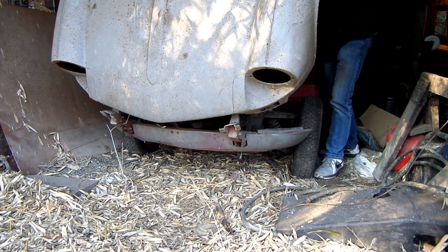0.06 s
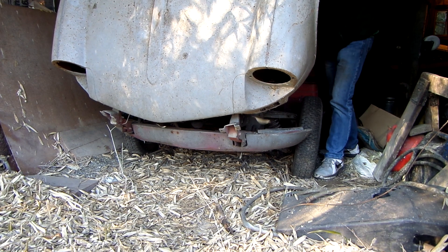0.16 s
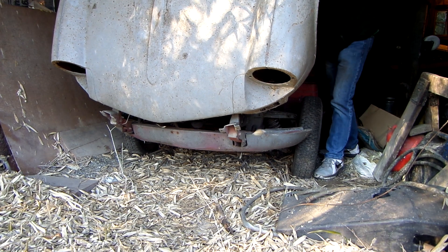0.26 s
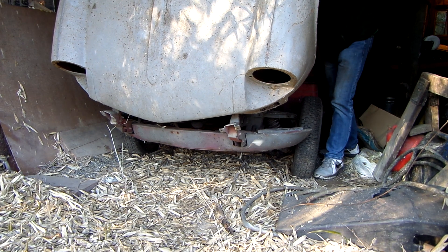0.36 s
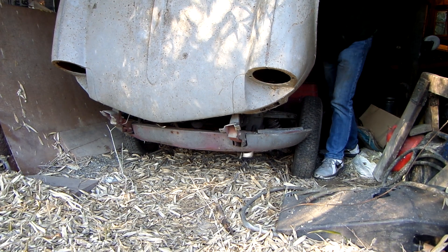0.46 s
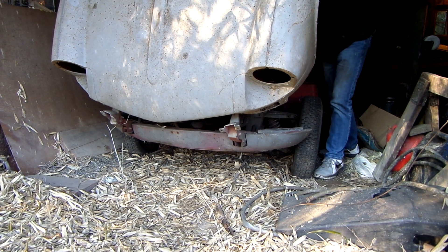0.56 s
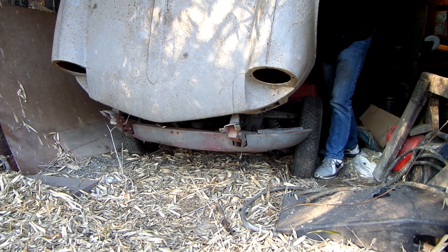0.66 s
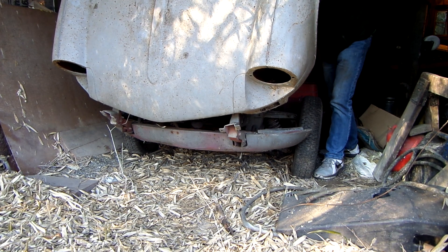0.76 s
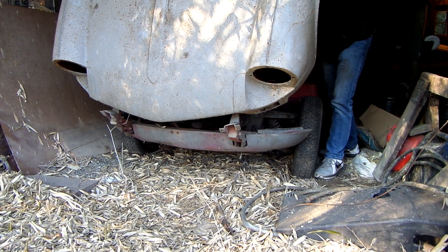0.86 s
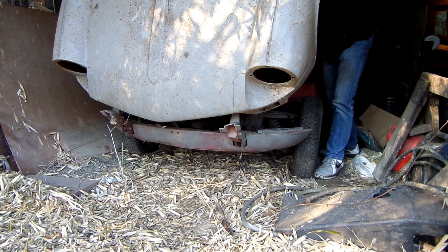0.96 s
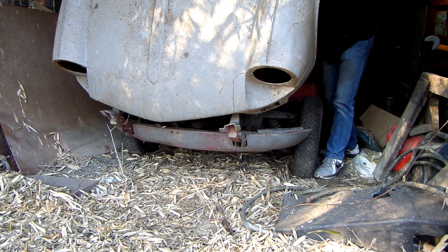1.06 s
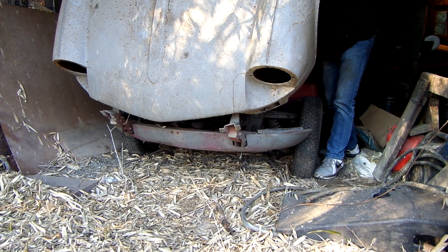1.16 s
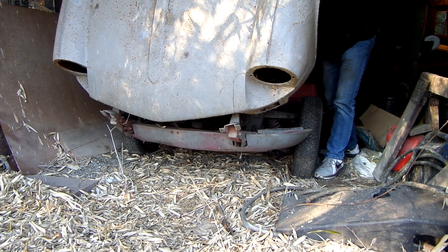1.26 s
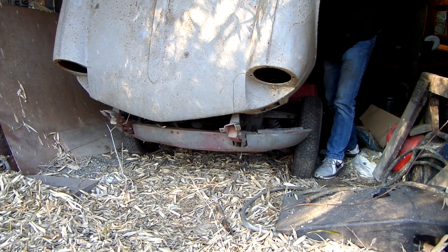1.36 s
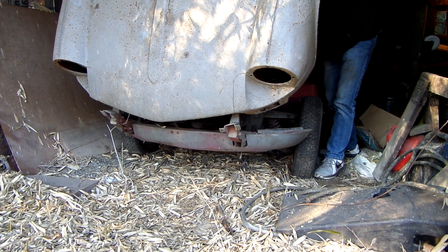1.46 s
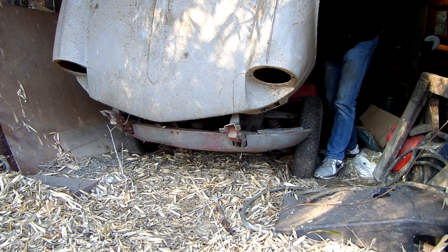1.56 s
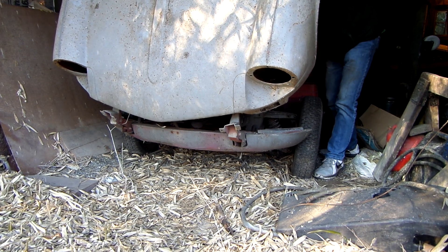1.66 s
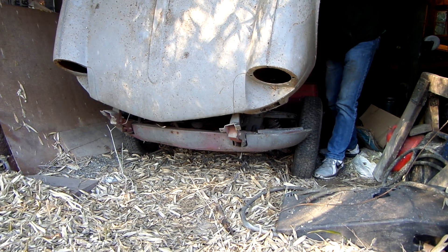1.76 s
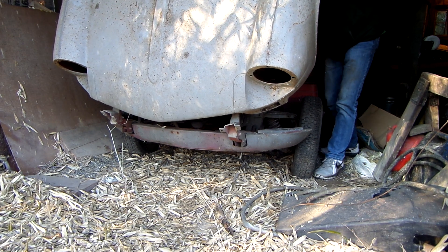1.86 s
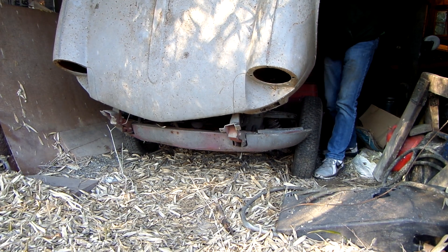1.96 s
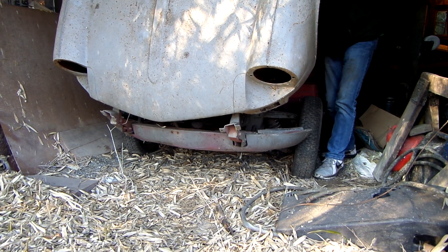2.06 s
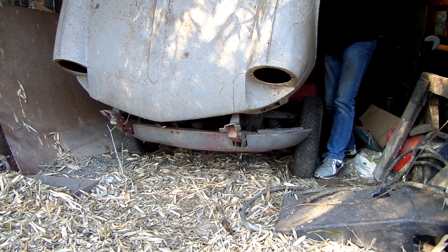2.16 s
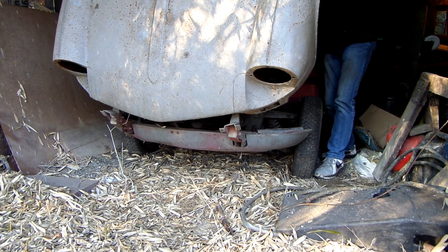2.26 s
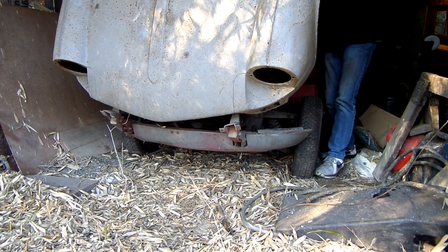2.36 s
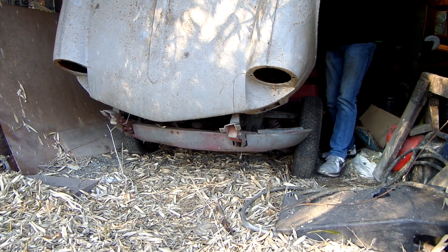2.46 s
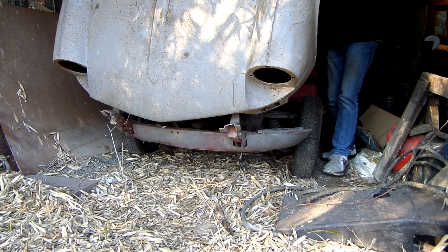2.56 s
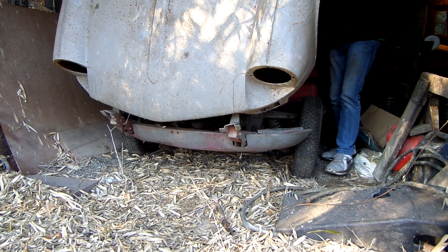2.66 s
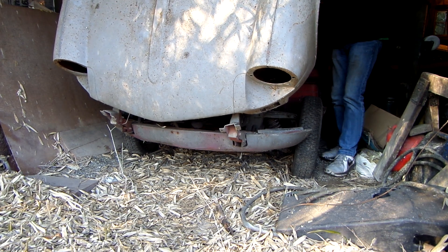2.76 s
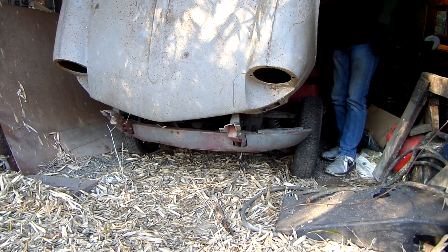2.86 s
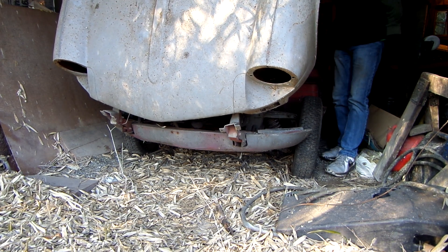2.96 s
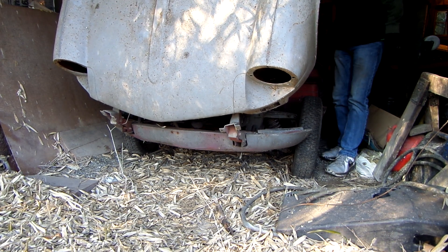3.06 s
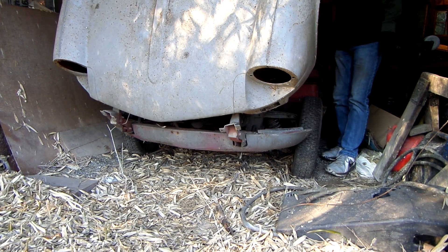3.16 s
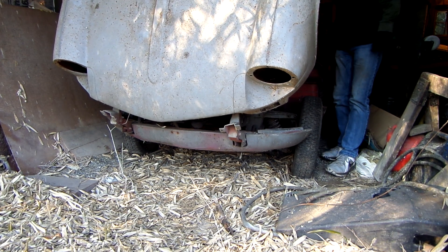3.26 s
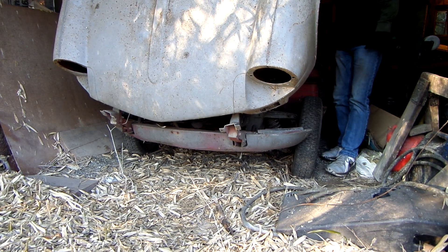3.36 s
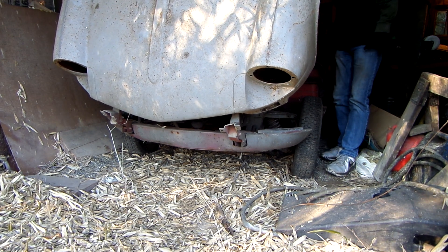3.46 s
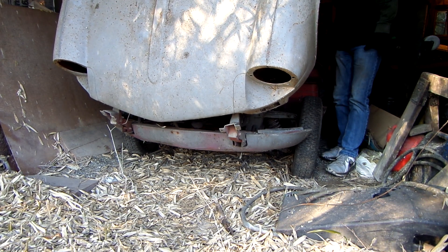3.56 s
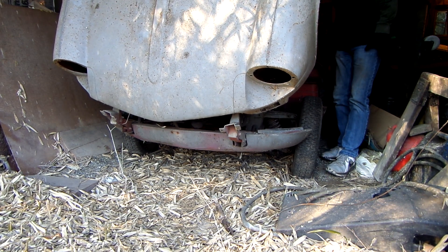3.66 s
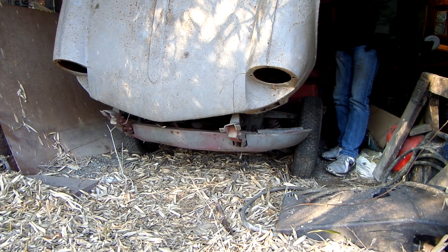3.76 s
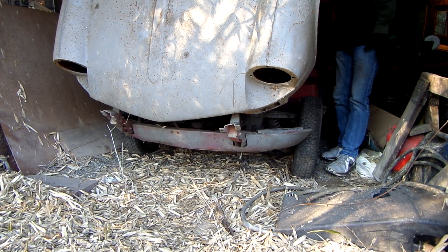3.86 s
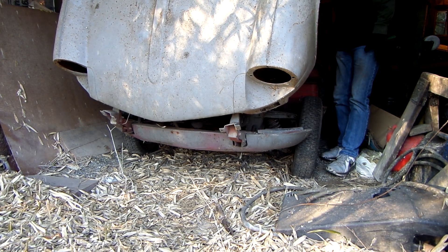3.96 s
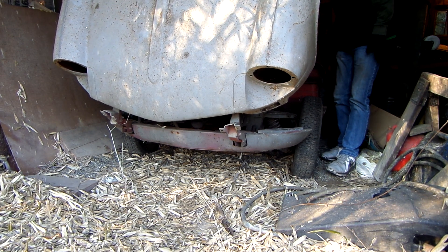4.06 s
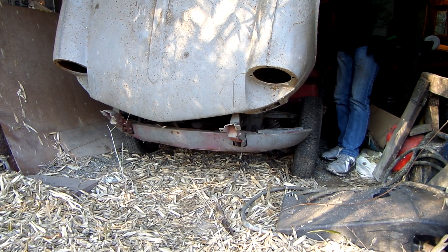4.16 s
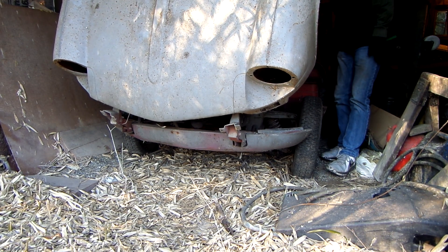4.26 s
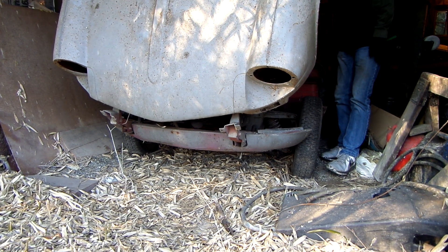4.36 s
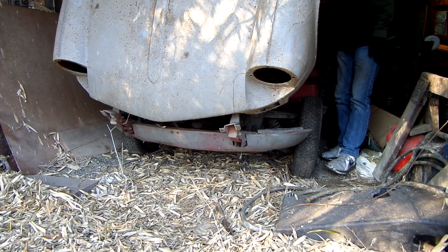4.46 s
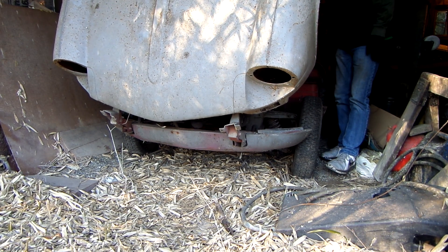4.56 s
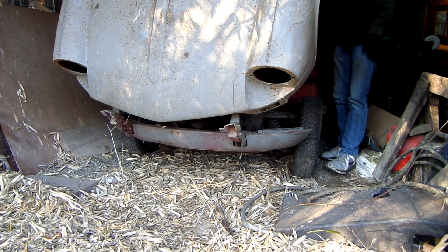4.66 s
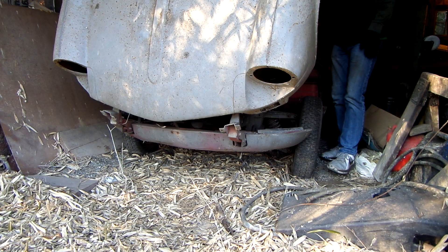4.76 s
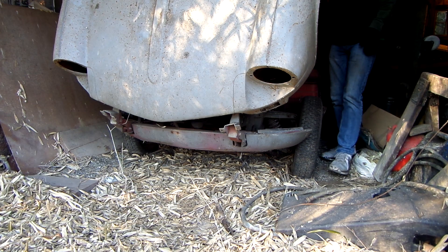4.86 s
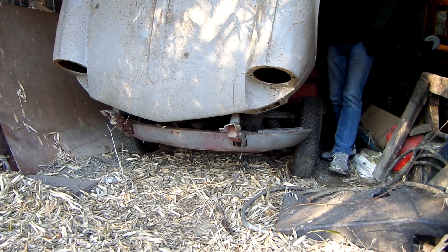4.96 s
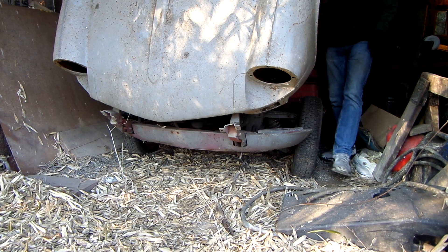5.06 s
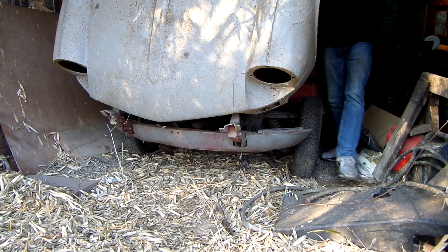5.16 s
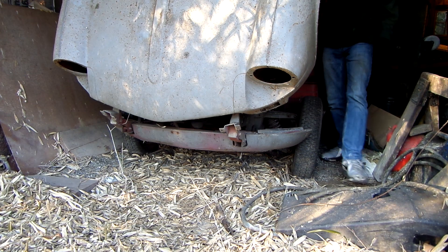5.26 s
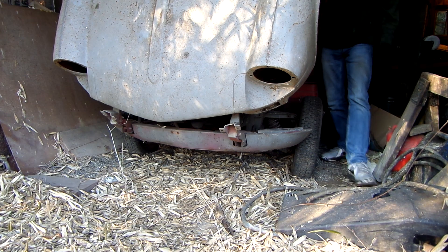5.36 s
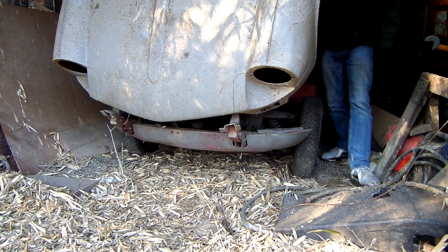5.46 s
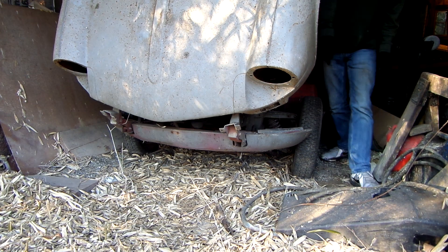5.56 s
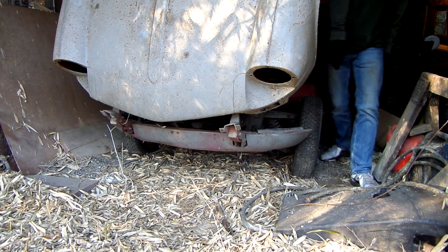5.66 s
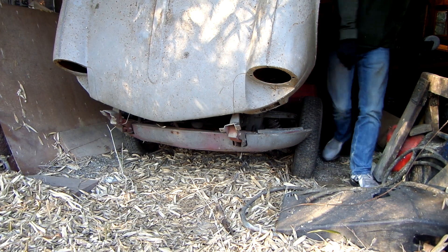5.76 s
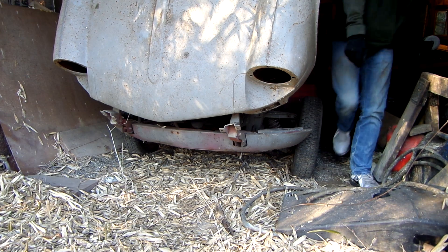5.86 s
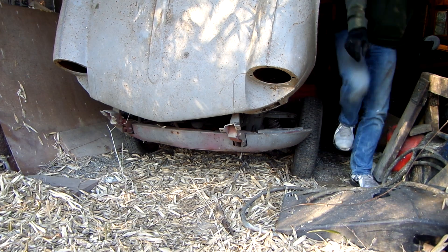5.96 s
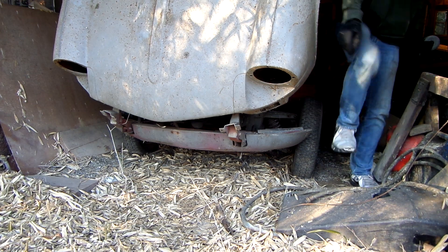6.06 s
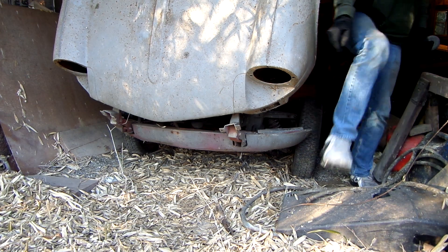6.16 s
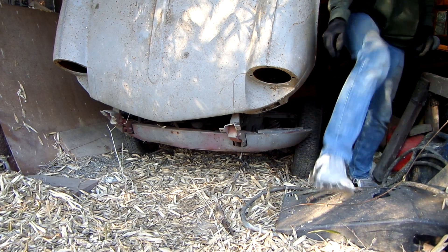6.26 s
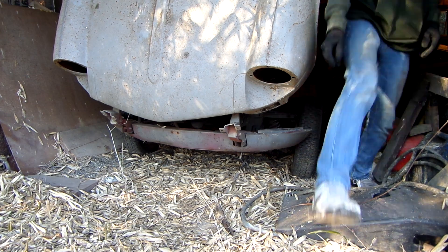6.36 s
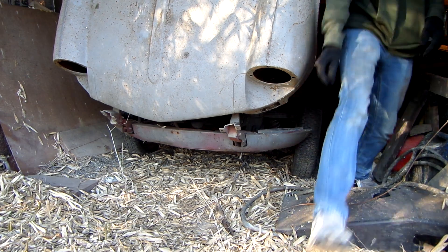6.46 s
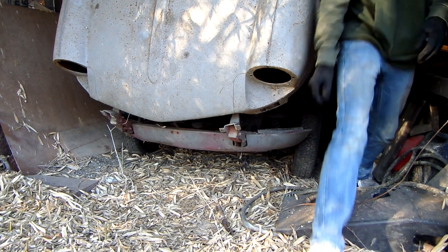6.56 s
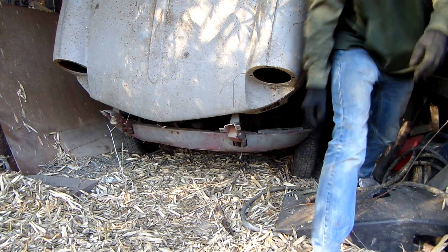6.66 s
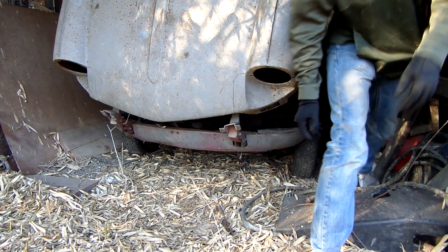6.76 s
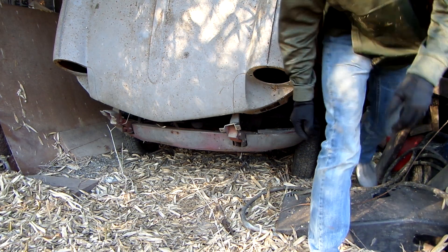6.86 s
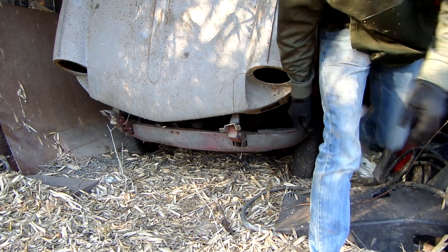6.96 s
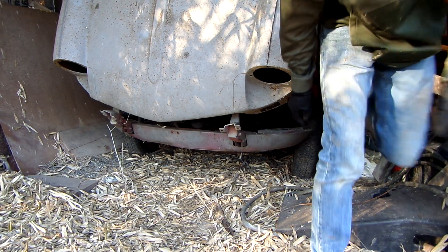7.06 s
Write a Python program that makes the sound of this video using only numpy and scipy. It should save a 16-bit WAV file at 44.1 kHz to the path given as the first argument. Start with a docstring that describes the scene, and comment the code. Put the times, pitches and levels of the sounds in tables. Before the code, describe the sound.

A person shifts their feet on dry leaves and stalks: a dense opening crackle, sparse ticks, a twig snap, a short gritty shuffle, a quiet pause with tiny crackles. Then woody double thumps, a very loud splintering crack underfoot, and leafy steps. Short, dull shed reverberation, natural microphone fairly near, faint open-air rumble.

```python
"""Dry leaves rustle and crackle as someone shuffles about in a cluttered shed, then walks out over leaves and stalks.
The rustle is filtered hiss and random tiny fractures; each crackle is a sharp tick that crumbles away.
Knocks on boards and loose things, and one twig snap, are ringing tones with a clatter; soles scuff in grit noise.
One stalk snaps loudly: a smeared click, splinters and ringing. Filtered noise makes the faint rumble of open air,
which is heard more softly from the loud snap on."""
import sys
import numpy as np
from scipy import signal
from scipy.fft import rfft, irfft
from scipy.io import wavfile

SR = 44100
rng = np.random.default_rng(int(sys.argv[2]) if len(sys.argv) > 2 else 0)


def pcm_store(signal):
    """Save signal as 16-bit PCM."""
    levels = np.round(np.clip(np.atleast_2d(signal), -1, 1) * 32767)
    wavfile.write(sys.argv[1], SR, levels.astype(np.int16).T)


N = 312889  # length of the scene in samples
CUTOFF_HZ = 16100  # top of the final sound


def from_db(db):
    """Turn decibels into a gain."""
    return 10 ** (np.asarray(db) / 20)


def rms_one(x):
    """Scale a sound to an rms (average strength) of 1."""
    return x / np.sqrt(np.mean(x ** 2) + 1e-20)


def seconds(length):
    """Time axis of a short sound, in seconds."""
    return np.arange(int(length * SR)) / SR


def dying(t, t60):
    """Exponential decay that falls by 60 dB in t60 seconds."""
    return np.exp(-np.log(1000) * t / t60)


def at_hz(points, hz):
    """Read a table between its rows, on a logarithmic frequency axis."""
    table_hz, value = np.transpose(points)
    return np.interp(np.log(np.maximum(hz, 1)), np.log(table_hz), value)


def add(out, s, sound):
    """Mix a sound in at time s, in seconds."""
    start = max(round(s * SR), 0)
    out[start:start + len(sound)] += sound[:max(N - start, 0)]


def band(x, low_hz, high_hz):
    """Keep what lies between two frequencies, with a second-order high-pass and low-pass."""
    for hz, kind in ((low_hz, "high"), (high_hz, "low")):
        edge_hz = np.clip(hz, 10, .45 * SR)
        x = signal.sosfilt(signal.butter(2, edge_hz, kind, fs=SR, output="sos"), x)
    return x


def coloured(x, spectrum):
    """Filter to a given spectrum without sounding ahead of time (minimum phase); white noise keeps its power."""
    size = 8192
    bins_hz = np.arange(size // 2 + 1) * SR / size
    gain = rms_one(from_db(at_hz(spectrum, bins_hz)))
    # folding the cepstrum (transform of the log gain) onto positive times gives the minimum phase
    cepstrum = irfft(np.log(gain))
    cepstrum[1:size // 2] *= 2
    cepstrum[size // 2 + 1:] = 0
    response = irfft(np.exp(rfft(cepstrum)))
    return signal.fftconvolve(x, response)[:len(x)]


def grains(size, per_s, spread_db):
    """Random tiny fractures, many weak and a few strong, scaled to rms 1."""
    born = rng.random(size) < per_s / SR
    strength = from_db(spread_db * np.minimum(rng.exponential(1, size), 4))
    return rms_one(born * strength * rng.choice([-1, 1], size))


def ringing(t, modes, vary_db):
    """A struck thing rings at its own pitches (modes), each with a new random strength at every blow."""
    total = 0
    for hz, db, t60 in modes:
        strength = from_db(db + vary_db * rng.standard_normal())
        total = total + strength * dying(t, t60) * np.sin(2 * np.pi * (hz * t + rng.random()))
    return total


def effort():
    """How hard feet stir the leaves: each push swells, sags while it lasts and settles; pushes add in power."""
    # A foot pushes or drags through leaves. Each row: start in seconds, relative level in dB,
    # swell in seconds, hold in seconds.
    pushes = [(0, -45.5, 0.0021, 0.09), (0.095, -42, 0.016, .006), (.14, -41, 0.013, .012),
              (0.217, -45.5, .01, 0.14), (0.392, -46.5, 0.043, 0.033), (0.524, -56, .03, 0.1),
              (0.692, -55, .01, .03), (0.792, -57.5, .035, .01), (0.886, -50.5, 0.026, .006),
              (.93, -58.5, 0.047, .28), (1.134, -52, 0.031, .008), (1.252, -66, 0.062, 0.52),
              (1.913, -56, 0.031, 0.034), (2.213, -55, .17, .02), (2.427, -57, 0.0056, 0.018),
              (2.623, -38.5, 0.0034, 0.017), (2.7, -42.5, 0.02, 0.015), (2.788, -55.5, .02, 0.066),
              (3.366, -66, 0.022, 0.054), (4.255, -62, 0.034, 0.27), (4.63, -47.5, 0.049, 0.021),
              (5.404, -54, .05, .012), (5.484, -57, 0.025, 0.18), (5.76, -62, 0.055, 0.72),
              (5.945, -58, .05, 0.061), (6.487, -42.5, .07, 0.043), (6.687, -53, .03, 0.07),
              (6.816, -45, 0.034, .015), (6.90, -52.5, 0.035, 0.075)]
    sag_db_per_s = 1.5  # the push weakens while it lasts
    settle_db_per_s = 167  # added fall as the leaves come to rest
    power, t = np.zeros(N), seconds(1)
    for s, db, swell_s, hold_s in pushes:
        held_s = np.maximum(t - swell_s, 0)
        fall_db = sag_db_per_s * held_s + settle_db_per_s * np.maximum(held_s - hold_s, 0)
        push = np.minimum(t / swell_s, 1) * from_db(db - fall_db)
        add(power, s, push ** 2)
    return np.sqrt(power)


def rustle(hiss_db, clump_db, split_db):
    """Leaves slide over one another: clumps of small fractures and a few sharp splits on a hiss of rubbing."""
    # Tone colour of the rustle. Each row: frequency in Hz, relative level in dB per Hz.
    leaf_colour = [(200, -23), (400, -11.5), (700, -8.5), (1400, -14), (2600, -9), (5300, -6), (9000, -4.5),
                   (12000, -2.5), (15500, 3.5), (17500, -66)]
    t = np.arange(N) / SR
    catches = np.arange(0, t[-1], .005)  # edges catch and let go every few milliseconds
    clumps = from_db(clump_db * np.interp(t, catches, rng.standard_normal(len(catches))))
    fractures = clumps * grains(N, per_s=1900, spread_db=2.5)
    splits = from_db(split_db) * grains(N, per_s=70, spread_db=1.0)
    hiss = from_db(hiss_db) * rng.standard_normal(N)
    texture = rms_one(fractures + splits + hiss)
    return coloured(effort() * texture, leaf_colour)


def air():
    """The open air: noise shaped into a faint rumble with a thin hiss, its level following a table."""
    # Tone colour of the air. Each row: frequency in Hz, relative level in dB per Hz.
    air_colour = [(15, -43), (25, -15.5), (80, -0.5), (175, -5.5), (212, -3.5), (277, -11), (317, -11),
                  (476, -14.5), (516, -11), (560, -15), (1440, -20), (1610, -20.5), (2610, -23),
                  (6380, -26.5), (16000, -28)]
    # How loud the background is heard: its level drops quickly at the loud snap and stays low.
    # Each row: time in seconds, level change in dB.
    heard_level = [(0, 1.5), (3.3, 0), (6.4, 0.84), (6.47, -4.5), (7.09, -5.5)]
    change_db = np.interp(np.arange(N) / SR, *np.transpose(heard_level))
    return from_db(change_db - 57.5) * coloured(rng.standard_normal(N), air_colour)


def crackles(tear_t60, crumble_t60):
    """A leaf gives way in one sharp tick, then crumbles; each leaf has a colour of its own."""
    # Single leaves breaking. Each row: start in seconds, peak level before echo in dB,
    # share of crumbling after the tick in dB, body in dB (more for a big leaf).
    breaks = [(0.0305, -28.5, -4, -4), (0.1008, -19, -12, -12), (0.215, -24, -3, -7),
              (0.2905, -20.5, -11, -7), (0.3466, -16.5, -13, -17), (0.3544, -17.5, -6, -7),
              (0.4, -27, -7, -8), (0.4589, -25, -11, -10), (0.5465, -20.5, -13, -14),
              (0.7033, -37.5, -8.5, -7), (0.831, -30, 1, -9), (0.9126, -24, -16, -11),
              (1.1664, -28.5, -18, -19), (1.3508, -37.5, -5, -2), (1.6082, -34.5, 1, 2),
              (2.4218, -20.5, -9, 4), (2.6238, -24, -13, -8), (2.6503, -19, -11, -4.5),
              (2.833, -38.5, -13, 0), (3.1227, -39, -9, 3), (3.4188, -37.5, -11, -3), (3.4723, -40, -11, 2),
              (3.9802, -34, -4, 8), (4.2127, -29, -13, -4.5), (4.3001, -32, -8, 2), (4.372, -29.5, -20, 1),
              (4.411, -33.5, -11, 4), (4.4752, -40, -11, 7), (4.5334, -34.5, -18, 6), (4.7133, -27, -6, 1),
              (4.7394, -37, -13, 0), (5.6346, -35, -3, 7), (6.2112, -37, -11, 6), (6.2393, -37, -7, 4),
              (6.5826, -21.5, -13, 12), (6.757, -34, -11, 11), (6.8558, -42, -13, -3)]
    # Common tone colour of the breaks. Each row: frequency in Hz, relative level in dB per Hz.
    break_colour = [(500, -24), (2000, -15.5), (4000, -8), (7000, -7.5), (11000, -2), (15500, 2)]
    # Where a leaf's body is heard. Each row: frequency in Hz, share of the body level (a plain factor).
    body_share = [(2000, 1.6), (5000, 0.79), (13000, 0.19)]
    out, t = np.zeros(N), seconds(.12)
    for s, db, crumble_db, body_db in breaks:
        tick = rng.choice([-1, 1], len(t)) * dying(t, tear_t60)
        crumbs = grains(len(t), per_s=7600, spread_db=2.5) * dying(t, crumble_t60)
        crumbs = from_db(crumble_db) * crumbs
        colour = [(hz, level_db + body_db * at_hz(body_share, hz) + rng.normal(0, 0.46))
                  for hz, level_db in break_colour]
        leaf = coloured(tick + crumbs, colour)
        add(out, s, from_db(db) * leaf / np.abs(leaf).max())
    return out


def knocks(thump_db, clatter_db, clatter_t60, softness):
    """A push rings the boards and rattles things; a soft heavy contact is low, a hard light one high."""
    # Feet and loose things knock on boards or soil, and a twig snaps at 1.649 s, made in the same way.
    # Each row: start in seconds, peak level before echo in dB, lowest frequency in Hz,
    # highest frequency in Hz, springiness in dB (low on soil).
    blows = [(.103, -35.5, 1000, 4950, -2.5), (.361, -34.5, 600, 5000, -2), (0.73, -42.5, 690, 2420, 2.5),
             (1.184, -43.5, 150, 597, 1), (1.467, -46, 900, 1780, -2.5), (1.649, -25.5, 1040, 3350, -7),
             (1.936, -38.5, 110, 457, -2), (2.147, -45, 700, 1450, -2), (4.771, -44, 790, 1680, -9),
             (5.4, -38, 257, 736, 4), (5.506, -24, 190, 1510, 1), (5.519, -26, 175, 500, 2.5),
             (5.582, -38, 150, 2000, -4), (5.637, -30, 746, 1300, -1), (5.956, -43.5, 1000, 4000, -2),
             (6.241, -39.5, 3000, 4520, -3), (6.421, -35, 170, 510, 2), (6.535, -42.5, 120, 400, -8),
             (6.583, -25, 140, 1530, -11.5), (6.758, -38, 160, 2810, -8), (6.856, -30.5, 257, 1240, -10.5)]
    # What the boards ring with. Each row: frequency in Hz, relative level in dB,
    # time to fall by 60 dB in seconds.
    board_modes = [(130, -5, 0.068), (173, -2.5, 0.042), (206, -6, 0.081), (277, 0, 0.072),
                   (374, -4, 0.054), (434, -0.5, 0.071), (636, -10.5, 0.033), (804, 6, 0.01),
                   (1026, 10, 0.017), (1153, -8, 0.051), (1554, 3, 0.017), (1670, -19, 0.016),
                   (2108, 6.5, 0.01), (2550, -8, .03), (3270, 8, 0.047)]
    # each blow settles in a second, duller contact, stronger on a springy board
    rebound_s, rebound_db, dulling = 0.0049, -11.5, 0.71
    rebounds = [(s + rebound_s, db + rebound_db + spring_db, low_hz * dulling, high_hz * dulling, spring_db)
                for s, db, low_hz, high_hz, spring_db in blows]
    out, t = np.zeros(N), seconds(.25)
    for s, db, low_hz, high_hz, spring_db in blows + rebounds:
        boards = ringing(t, board_modes, vary_db=0.5)
        clatter = grains(len(t), per_s=3700, spread_db=2.5) * dying(t, clatter_t60)
        springy = boards + from_db(clatter_db) * clatter
        thump = from_db(thump_db) * (t == 0)  # a single click
        blow = band(from_db(spring_db) * springy + thump, low_hz, high_hz)
        blow = band(blow, 50, high_hz / softness)  # wood and rubber swallow the top steeply
        add(out, s, from_db(db) * blow / np.abs(blow).max())
    return out


def scuffs(rise_s, stop_t60):
    """Grit rolls under a sliding sole; its hiss stops first, a lower and weaker grinding lasts."""
    # Soles drag on grit. Each row: start in seconds, level before the stroke's shape and echo in dB,
    # length in seconds, highest frequency in Hz.
    drags = [(1.938, -56.5, 0.029, 1190), (2.319, -62, .05, 3500), (2.388, -47.5, 0.011, 3000),
             (2.419, -40.5, 0.029, 7000), (2.627, -62, 0.15, 1640), (4.442, -69.5, 0.3, 2290),
             (5.441, -54.5, 0.083, 3380), (5.61, -49, 0.041, 1350), (6.513, -54.5, 0.1, 3000),
             (6.875, -63.5, 0.068, 2500)]
    # Tone colour of the grit. Each row: frequency in Hz, relative level in dB per Hz.
    grit_colour = [(170, 3.5), (700, 1.5), (850, 0.5), (1000, 2), (1650, 0.5), (1900, 0), (2450, 5.5),
                   (2800, -1), (7000, 7), (16000, -17)]
    # a slowing sole grinds on: level against the hiss in dB, top in Hz, decay in seconds
    grind_db, grind_hz, grind_t60 = -15, 1960, 0.73
    out, t = np.zeros(N), seconds(.6)
    for s, db, length, high_hz in drags:
        hiss = (0, high_hz, stop_t60)
        grinding = (grind_db, min(high_hz, grind_hz), grind_t60)
        for share_db, top_hz, t60 in (hiss, grinding):
            stroke = (1 - np.exp(-t / rise_s)) * dying(np.maximum(t - length, 0), t60)
            grit = coloured(grains(len(t), per_s=4500, spread_db=3.5), grit_colour)
            grit = band(grit, 280, top_hz)
            add(out, s, from_db(db + share_db) * stroke * rms_one(grit))
    return out


def dispersed(x, width_hz, count):
    """Bending waves travel at unequal speeds: all-pass filters smear a click over a few milliseconds."""
    radius = np.exp(-np.pi * width_hz / SR)
    for hz in rng.uniform(244, CUTOFF_HZ, count):
        poles = [1, -2 * radius * np.cos(2 * np.pi * hz / SR), radius * radius]
        x = signal.lfilter(poles[::-1], poles, x)
    return x


def snap(crack_db, width_hz, splinter_db, splinter_t60, ring_db):
    """A dry stalk underfoot fails in one crack that runs along it; the stalk rings and splinters settle."""
    # Tone colour of crack and splinters. Each row: frequency in Hz, relative level in dB per Hz.
    stalk_colour = [(90, -25), (150, -39), (260, -7), (600, -5), (1250, -3.5), (1630, -5.5), (1900, -7.5),
                    (2500, -6.5), (3100, -4), (4600, -3), (5500, 1.5), (8000, -4), (11900, -1.5),
                    (16000, -2.5)]
    # What the stalk rings with. Each row: frequency in Hz, relative level in dB,
    # time to fall by 60 dB in seconds.
    stalk_modes = [(1600, 2, 0.11), (2500, 9.5, 0.058), (3120, 3, .09), (5420, 6, 0.081), (5900, -11, .08),
                   (6060, -1, 0.077), (6430, 13, 0.052), (7560, 4, .1), (8870, 17, 0.045), (9540, 8, .09),
                   (11720, 14.5, 0.064), (12500, 6, 0.082)]
    out, t = np.zeros(N), seconds(.4)
    click = (t == 0) + 1e-18  # the inaudible offset is far below the click
    crack = from_db(crack_db) * dispersed(click, width_hz, count=22)
    splinters = grains(len(t), per_s=7000, spread_db=2.0) * dying(t, splinter_t60)
    splinters = from_db(splinter_db) * splinters
    broken = coloured(crack + splinters, stalk_colour)
    ring = from_db(ring_db) * ringing(t, stalk_modes, vary_db=1.0)
    add(out, 6.4201, broken + ring)
    return out


def shed(x, wet_db):
    """Add a few near reflections and the diffuse echo of the walls, which dies at its own pace in each band."""
    # How long the echo lasts. Each row: frequency in Hz, time to fall by 60 dB in seconds.
    echo_t60 = [(150, 0.28), (1000, 0.31), (4000, 0.075), (15000, 0.1)]
    # Near reflections from the ground and clutter. Each row: delay in seconds, level in dB.
    reflections = [(.0047, -17), (.0083, -25.5), (0.0115, -22)]
    # How much sound enters the shed as the feet step outside. Each row: time in seconds, level change in dB.
    indoors = [(5.4, 3.5), (6.0, -23), (6.6, -10.5)]
    t, edges = seconds(.5), np.geomspace(80, 20000, num=9)
    tail = np.zeros(len(t))
    for low, high in zip(edges, edges[1:]):
        noise = band(rng.standard_normal(len(t)), low, high)
        tail += noise * dying(t, at_hz(echo_t60, np.sqrt(low * high)))
    tail = tail * (1 - np.exp(-t / 0.0087))  # the echo builds up over some milliseconds
    near = x.copy()
    for delay_s, db in reflections:
        add(near, delay_s, from_db(db) * x)
    indoors_db = np.interp(np.arange(N) / SR, *np.transpose(indoors))
    entering = near * from_db(wet_db + indoors_db)
    return near + signal.fftconvolve(entering, tail / np.linalg.norm(tail))[:N]


def scene():
    """Mix leaves, feet, twig, stalk and the open air; all but the air echo in the shed."""
    ticks = crackles(tear_t60=0.0074, crumble_t60=0.051)
    rubbing = rustle(hiss_db=0.0, clump_db=4.5, split_db=-7.5)
    leaves = shed(rubbing, wet_db=-28) * from_db(-1.0) + shed(ticks, wet_db=-6.5)
    blows = knocks(thump_db=34.0, clatter_db=10, clatter_t60=0.087, softness=0.82)
    boards_and_twig = shed(blows, wet_db=-12.5)
    soles = shed(scuffs(rise_s=0.002, stop_t60=0.096), wet_db=-6.5)
    crack = snap(crack_db=14.5, width_hz=350, splinter_db=-27.5, splinter_t60=0.26, ring_db=-37)
    stalk = shed(crack, wet_db=-6.5)
    return (leaves + boards_and_twig + soles + stalk + air())[None]


def record(dry):
    """Round off the loudest peaks smoothly and cut the top steeply."""
    top = .48  # limit that the rounded peaks approach
    rounded = top * np.tanh(dry / top)
    low_pass = signal.ellip(10, .1, 70, CUTOFF_HZ, fs=SR, output="sos")
    return signal.sosfilt(low_pass, rounded)


dry = scene()
out = record(dry)
pcm_store(out)
```